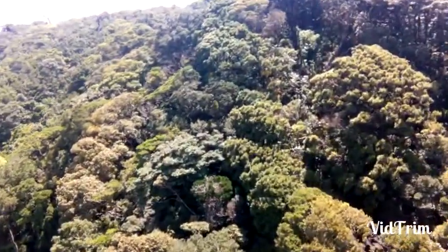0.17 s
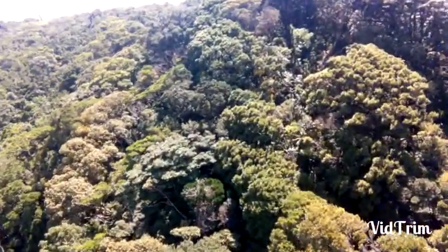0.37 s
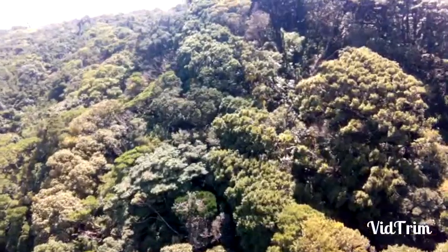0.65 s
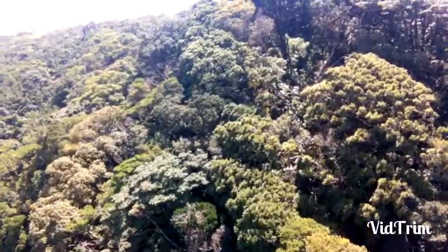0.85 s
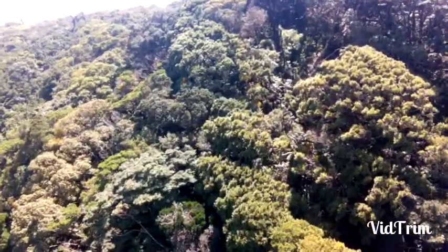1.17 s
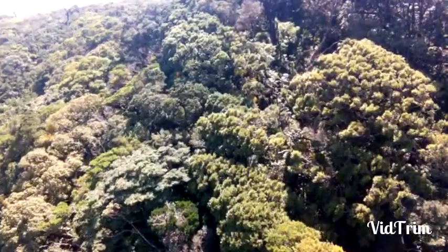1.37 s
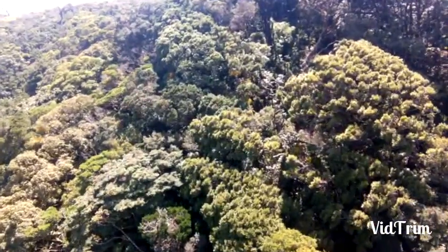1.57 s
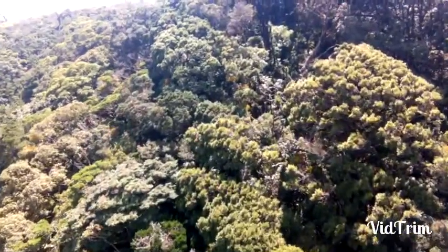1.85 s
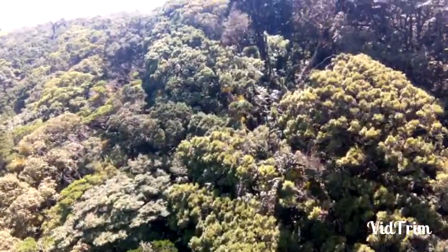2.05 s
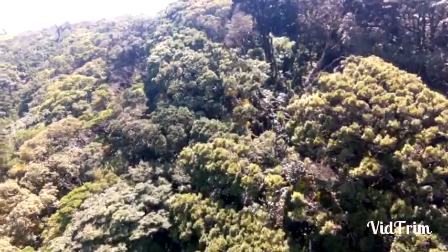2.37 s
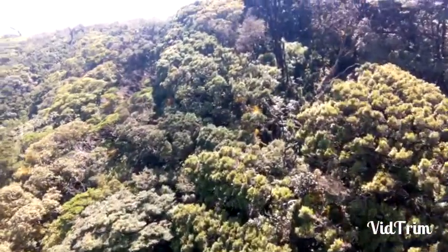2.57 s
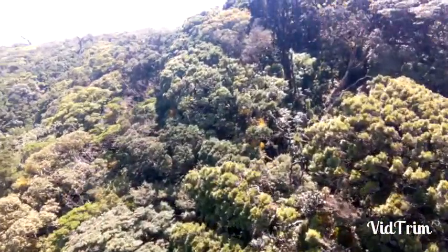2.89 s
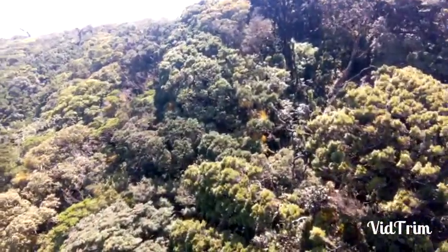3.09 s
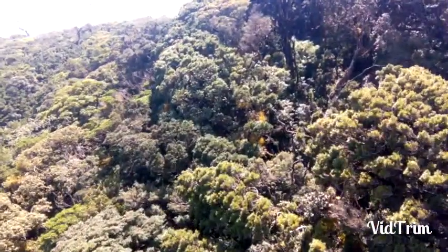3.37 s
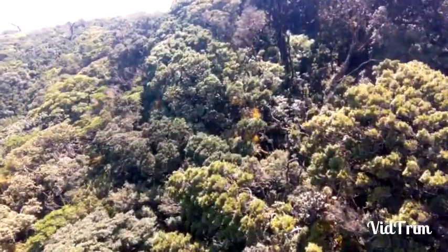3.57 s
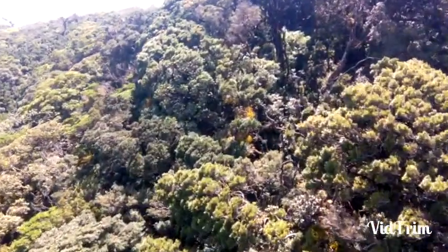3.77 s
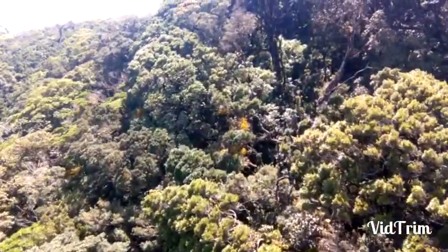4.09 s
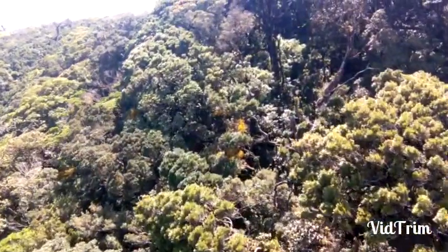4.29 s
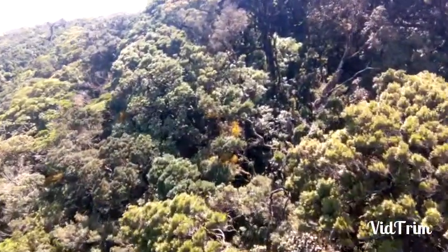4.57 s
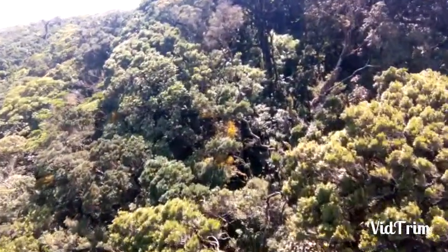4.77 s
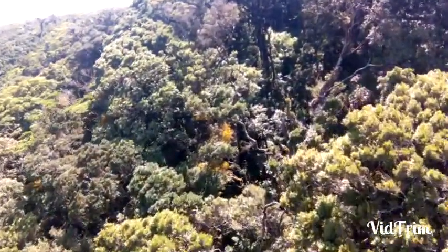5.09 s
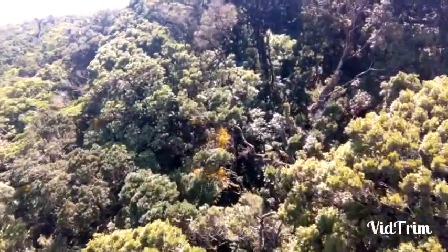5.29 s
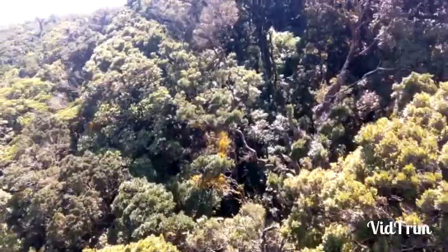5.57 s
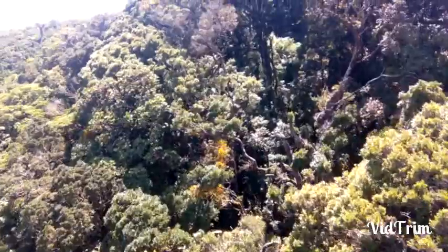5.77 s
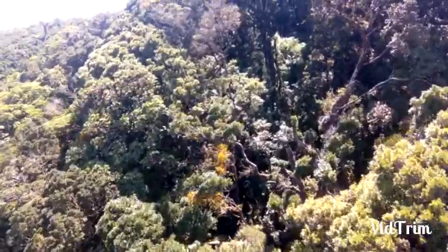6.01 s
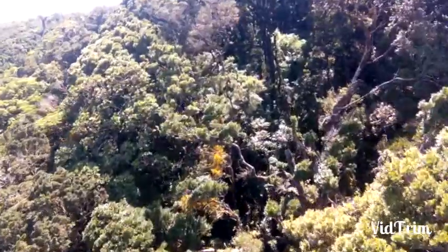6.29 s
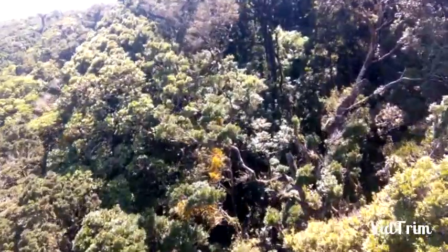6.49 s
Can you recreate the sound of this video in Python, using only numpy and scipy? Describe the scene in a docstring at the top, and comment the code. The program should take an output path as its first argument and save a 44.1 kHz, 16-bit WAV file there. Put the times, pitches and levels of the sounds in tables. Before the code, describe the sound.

Heard from the rider's hand outdoors above a forest, a zipline trolley runs continuously and slows gently. Its wheel makes dense gritty hiss and several high metallic ringing tones over a weak falling hum. Strong wind buffeting bursts on the left port at first, with dull pops and flutters, lighter on the right; later the air calms, leaving the trolley exposed with small jolting rasps. Dry, close, with dulled top treble.

```python
"""Rolling hiss and ringing metal from the first instant, gusts close behind: a zipline trolley on a
steel cable, heard from the rider's hand, slowing down. Contact noise rings the trolley's modes over
a broad hiss; the cable's strands hum falling near-sine tones. Wind noise, shaped gust by gust, and
single strong eddies push on two microphone ports, mostly the left one."""
import sys
import numpy as np
from scipy import signal
from scipy.fft import rfft, irfft
from scipy.io import wavfile
from scipy.ndimage import uniform_filter1d

SR = 44100
rng = np.random.default_rng(int(sys.argv[2]) if len(sys.argv) > 2 else 0)


def decibels_to_gain(level_db):
    """Convert a level in decibels to a linear amplitude gain (20 dB per decade)."""
    exponent = np.asarray(level_db, float) / 20
    return 10 ** exponent


def store_pcm(level_fs):
    """Save levels as 16-bit WAV."""
    pcm = np.round(np.clip(level_fs, -1, 1) * 32767).astype(np.int16)
    wavfile.write(sys.argv[1], SR, np.atleast_2d(pcm).T)


N = 292824
STRANDS_START_HZ = 372  # cable strands passed per second at the start


def rms_one(x):
    """Scaled to rms 1."""
    return x / np.sqrt(np.mean(x ** 2) + 1e-20)


def drift(rate_hz):
    """Slow random curve of rms 1: noise at every 40th sample through a double one-pole low-pass."""
    hop, settle = 40, 2000
    pole = np.exp(-2 * np.pi * rate_hz * hop / SR)
    noise = rng.standard_normal(N // hop + settle + 2)
    slow = signal.lfilter([1], [1, -2 * pole, pole * pole], noise)[settle:]
    return np.interp(np.arange(N) / hop, np.arange(len(slow)), rms_one(slow))


def flutter(rate_hz):
    """Random curve of rms 1 with the slow swells taken out."""
    quick = drift(rate_hz)
    return rms_one(quick - uniform_filter1d(quick, size=5000))


def low_pass(x, hz, poles):
    """Cascade of one-pole low-passes."""
    pole = np.exp(-2 * np.pi * hz / SR)
    for _ in range(poles):
        x = signal.lfilter([1 - pole], [1, -pole], x)
    return x


def resonate(x, hz, width_hz):
    """Two-pole resonance, gain 1 on top."""
    r = np.exp(-np.pi * width_hz / SR)
    poles = [1, -2 * r * np.cos(2 * np.pi * hz / SR), r * r]
    return signal.lfilter([(1 - r * r) / 2, 0, (r * r - 1) / 2], poles, x)


def to_ports(shared, own, alike):
    """Right port hears the shared noise; the left hears it blended with its own, by likeness."""
    return [alike * shared + np.sqrt(1 - alike ** 2) * own, shared]


# Gusts. Each row: full strength from in seconds, held in seconds, level in dB, port 0 left 1 right.
GUSTS = [(.06, .1, -26, 0), (.19, .32, -21.5, 0), (.64, 0.068, -23, 0), (.75, .38, -18.5, 0),
         (1.159, 0.16, -21, 0), (1.399, 0.3, -19.5, 0), (1.83, 0.15, -24.5, 0), (1.97, .19, -26, 0),
         (2.33, .2, -27.5, 0), (2.55, .06, -24.5, 0), (2.66, 0.12, -29.5, 0), (3.05, 0.14, -27.5, 0),
         (3.29, 0.022, -28, 0), (3.38, .22, -33, 0), (3.67, .1, -27.5, 0), (3.8, .16, -31.5, 0),
         (4.2, .22, -38.5, 0), (4.61, 0.025, -29, 0), (4.72, .06, -31.5, 0), (4.8, 0.12, -28, 0),
         (4.96, 0.067, -25.5, 0), (5.05, .26, -30.5, 0), (5.43, .03, -33.5, 0), (5.69, 0.097, -34, 0),
         (5.95, .05, -35.5, 0), (6.53, .04, -33, 0), (6.62, .03, -31, 0), (.12, 0.22, -30, 1),
         (.35, .2, -35.5, 1), (.7, .25, -33.5, 1), (1.05, 0.097, -33, 1), (1.47, .03, -29.5, 1),
         (1.68, .02, -37, 1), (2.21, .07, -35, 1), (3.04, .02, -35.5, 1)]
# Calm breeze: left level in dB, right level in dB.
CALM_DB = (-42.5, -52.5)


def gusts():
    """Wind level at each port in dB: every gust rises, holds and falls over a calm breeze."""
    rise_db_per_s, fall_db_per_s = 299, 218.5
    t = np.arange(N) / SR
    power = decibels_to_gain(CALM_DB)[:, None] ** 2 * np.ones(N)
    for start_s, held_s, level_db, port in GUSTS:
        before_s = np.maximum(start_s - t, 0)
        after_s = np.maximum(t - start_s - held_s, 0)
        lost_db = rise_db_per_s * before_s + fall_db_per_s * after_s
        power[int(port > .5)] += decibels_to_gain(level_db - lost_db) ** 2
    return 10 * np.log10(power)


def mic_bass_cut(x):
    """The microphones lose the deepest bass of the wind."""
    return signal.sosfilt(signal.butter(4, 79, "high", fs=SR, output="sos"), x)


def buffeting(level_db):
    """Eddies push on the port one way, at random, over a turbulent rumble; stronger wind is brighter."""
    eddies_per_s, eddy_spread_db, eddy_share = 120, 3.5, .66  # share of power
    low_hz, high_hz = 140, 340
    sizes = decibels_to_gain(eddy_spread_db * np.minimum(rng.exponential(1, N), 3))
    pushes = (rng.random(N) < eddies_per_s / SR) * sizes
    rumble = rng.standard_normal(N) * decibels_to_gain(2 * drift(29))
    air = np.sqrt(eddy_share) * rms_one(pushes - pushes.mean()) + np.sqrt(1 - eddy_share) * rumble
    dull = low_pass(low_pass(air, low_hz, 2), high_hz, 1)
    bright = low_pass(air, high_hz, 4)
    strong = np.clip((level_db + 37.5) / 22, 0, 1) ** 1.5
    mix = (1 - strong) * rms_one(mic_bass_cut(dull)) + strong * rms_one(mic_bass_cut(bright))
    return decibels_to_gain(level_db) * rms_one(mix)


# Strongest eddies. Each row: time in seconds, approximate peak in dB, port 0 left 1 right,
# width at half height in ms.
THUMPS = [(.2141, -9.2, 0, 1.8), (.2922, -10.7, 0, 1.7), (.3057, -12.6, 1, 1), (.3484, -9.5, 0, .8),
          (.3512, -6.5, 0, 2.4), (.4366, -8.5, 0, 1), (.7191, -14.6, 1, .95), (.7321, -13.6, 1, .75),
          (.7603, -6, 0, 1.7), (.8141, -9.7, 0, 1.1), (.872, -11.3, 0, 1.9), (.8855, -10.9, 0, 1.7),
          (.9593, -9.6, 0, 1.8), (1.032, -6.2, 0, 1.5), (1.0452, -6.6, 0, 1.5), (1.0613, -6.8, 0, 1),
          (1.0742, -9.1, 0, 1.5), (1.0977, -8.4, 0, 1.3), (1.278, -9.7, 0, 1.2), (1.4082, -6.8, 0, 1.2),
          (1.4815, -15.3, 1, 1.3), (1.512, -10.3, 0, 1.1), (1.5705, -9.5, 0, 1.25), (1.5945, -6.6, 0, 1),
          (1.6556, -8.7, 0, 1.4), (1.7022, -9.8, 0, 1), (1.8541, -9.3, 0, .8), (1.9817, -13.3, 0, .9),
          (2.0488, -9, 0, 1.1), (2.316, -14, 0, .8), (2.3327, -12.5, 0, .8), (2.5719, -11, 0, 2.2),
          (3.0543, -20.5, 1, 1.9), (5.0075, -14.7, 0, 1.9)]


def thumps():
    """Each strong eddy is one bell-shaped push between a shallow dip and a deeper pull that dies slowly."""
    lead, tail = 400, 600  # samples
    out = np.zeros((2, N + tail))
    t_ms = np.arange(-lead, tail) / SR * 1000
    for time_s, peak_db, port, width_ms in THUMPS:
        push = 1.12 * np.exp(-(t_ms / (.62 * width_ms)) ** 2)
        dip = .13 * np.exp(-((t_ms + 1.4 * width_ms) / (2 * width_ms)) ** 2)
        after = np.maximum(t_ms / (1.5 * width_ms), 0)
        pull = .46 * after * np.exp(1 - after ** 1.6)
        at = round(time_s * SR) - lead
        out[int(port > .5), at:at + len(t_ms)] += decibels_to_gain(peak_db) * (push - pull - dip)
    return out[:, :N]


def wind():
    """Buffeting at each port, turned down around each strong eddy, plus the strong eddies."""
    strong_eddies = thumps()
    duck = 1 / (1 + 14 * uniform_filter1d(np.abs(strong_eddies), size=400))
    return duck * [buffeting(level_db) for level_db in gusts()] + strong_eddies


# Speed-tied tones. Each row: multiple of the strand rate, left in dB and right in dB over the hum level,
# waver in dB, dB lost per dB of speed.
HUM = [(1, 1, 1.5, 3, 1), (.38, 2, 0, 3.5, 0)]


def hum(strands_hz):
    """Near-sine tones that fall with the speed, wavering in pitch and strength."""
    hum_db = -49
    phase = 2 * np.pi * np.cumsum(strands_hz * (1 + .009 * drift(7))) / SR
    out = np.zeros((2, N))
    for multiple, left_db, right_db, waver_db, follows in HUM:
        level_db = np.array([[left_db], [right_db]]) + hum_db + waver_db * drift(9)
        slowing = (strands_hz / STRANDS_START_HZ) ** follows
        out += np.sqrt(2) * decibels_to_gain(level_db) * np.sin(multiple * phase) * slowing
    return out


def grit(spread_db):
    """Two channels of dense contact noise of uneven grain size, 0 dB per Hz."""
    sizes = decibels_to_gain(spread_db * np.minimum(rng.exponential(1, (2, N)), 5))
    return rms_one(sizes * rng.standard_normal((2, N))) * np.sqrt(SR / 2)


# Worst spots on the cable. Each row: time in seconds, extra force in dB against the steady contact.
JOLTS = [(.229, -6.5), (1.279, -0.5), (1.866, -5), (3.192, -1), (3.735, 5), (3.829, -2), (4.791, 0.5),
         (5.36, 1), (5.773, 6.5), (6.048, -3), (6.562, 4)]


def jolts():
    """Rough spots press the wheel harder for a few milliseconds: extra contact force, near 0 between."""
    small_per_s, small_db, small_spread_db, decay_ms = 2.5, -5, 2, 7
    sizes = decibels_to_gain(small_db + small_spread_db * rng.standard_normal(N))
    hits = (rng.random(N) < small_per_s / SR) * sizes
    for time_s, extra_db in JOLTS:
        hits[round(time_s * SR)] = decibels_to_gain(extra_db)
    return signal.lfilter([1], [1, -np.exp(-1000 / (decay_ms * SR))], hits + 1e-18)


# Trolley modes in Hz.
MODE_HZ = [944, 1320, 1782, 2330, 3060, 3300, 3628, 4400, 4465, 4824, 5090, 5575, 5890]
# How each mode reaches the ports. Each row: width in Hz, left in dB per Hz, right in dB per Hz,
# likeness 0-1.
MODE_HEARD = [(21.7, -60.5, -63, 0.96), (117, -58.5, -49.5, 0.62), (28, -54.5, -51, 0.66),
              (240, -65, -63, 0.6), (100, -67.5, -61, 0.7), (150, -64.5, -56.5, .5),
              (75, -51.5, -51.5, 0.2), (90, -68.5, -58, 1), (50, -57.5, -58, 0.94),
              (40.5, -49.5, -52.5, 0.95), (25, -56, -74.5, 0.14), (25, -56.5, -82.5, 0.03),
              (120, -57.5, -74, 0.7)]


def ringing_modes(force, rough):
    """Fluttering contact noise and jolts ring the trolley's resonances."""
    rung = np.zeros((2, N))
    for hz, (width_hz, left_db, right_db, alike) in zip(MODE_HZ, MODE_HEARD):
        contact = grit(1.66) * force * (decibels_to_gain(1.17 * flutter(18)) + rough)
        shared, own = resonate(contact, hz, width_hz)
        rung += decibels_to_gain([[left_db], [right_db]]) * to_ports(shared, own, alike)
    return rung


# Broad rolling hiss. Each row: frequency in Hz, left in dB per Hz, right in dB per Hz, likeness 0-1.
HISS = [(40, -70.5, -80.5, 0.4), (100, -76, -67.5, 0.4), (308, -74.5, -73.5, 1), (654, -65, -67.5, 0.55),
        (990, -64, -70, 0.7), (1590, -71, -66.5, 0), (1970, -66.5, -65.5, 0.56), (2800, -71, -63.5, 0.46),
        (3760, -60, -59.5, 0.5), (5030, -60.5, -59, 0.9), (5630, -62, -64, 0.4), (6000, -53.5, -67, 0.7),
        (6550, -54, -69.5, 0.7), (6670, -57.5, -68, 0.8), (7940, -67.5, -89, 0.2), (9080, -81, -110, .1)]


def hiss_spectrum(force, rough, hz):
    """Spectrum of the contact noise shaped into a broad hiss at each port."""
    corner_hz, *columns = np.transpose(HISS)
    left_db, right_db, alike = [np.interp(np.log(hz), np.log(corner_hz), c) for c in columns]
    shared, own = rfft(grit(2.9) * force * (1 + 0.58 * rough))
    return decibels_to_gain([left_db, right_db]) * to_ports(shared, own, alike)


# Phase by which the left port leads. Each row: frequency in Hz, lead in radians.
PORTS = [(0, 0), (650, -.9), (950, 0), (1450, 1.9), (1750, 1.5), (1950, 3.0), (2350, 1.9), (2800, 2.9),
         (3300, 4.6), (3800, 5.8), (4050, 4.5), (4850, 6.2), (6250, 8.0), (7000, 7.2)]


def trolley(force_db, treble_db):
    """Wheel-on-wire contact rings the modes and hisses; the ports hear it partly alike."""
    force = decibels_to_gain(force_db + 0.65 * flutter(27))
    rough = jolts()
    hz = np.fft.rfftfreq(N, 1 / SR) + 1
    sound = rfft(ringing_modes(force, rough)) + hiss_spectrum(force, rough, hz)
    sound[0] *= np.exp(1j * np.interp(hz, *np.transpose(PORTS)))
    treble = 1 / (1 + (4200 / hz) ** 4)  # the top fades faster as the wheel slows
    return irfft(sound * (1 - treble), N) + decibels_to_gain(treble_db) * irfft(sound * treble, N)


def scene():
    """Speed sets hum pitch and level, rolling force and treble; gusts set the wind."""
    slowing_hz_per_s, easing_hz_per_s2 = 20.5, .16  # braking eases as drag falls
    t = np.arange(N) / SR
    strands_hz = STRANDS_START_HZ - slowing_hz_per_s * t + easing_hz_per_s2 * t ** 2
    speed_db = 20 * np.log10(strands_hz / STRANDS_START_HZ)
    force_db = 1.93 + 0.77 * speed_db
    treble_db = -3 + .25 * speed_db
    return wind() + hum(strands_hz) + trolley(force_db, treble_db)


def top_cut(x):
    """Nothing passes above the cut-off."""
    return signal.sosfilt(signal.butter(12, 9300, fs=SR, output="sos"), x)


def record(dry):
    """The microphones roll off in the treble."""
    dull = signal.sosfilt(signal.butter(4, 7250, fs=SR, output="sos"), dry)
    return top_cut(dull)


dry = scene()
out = record(dry)
store_pcm(out)
```